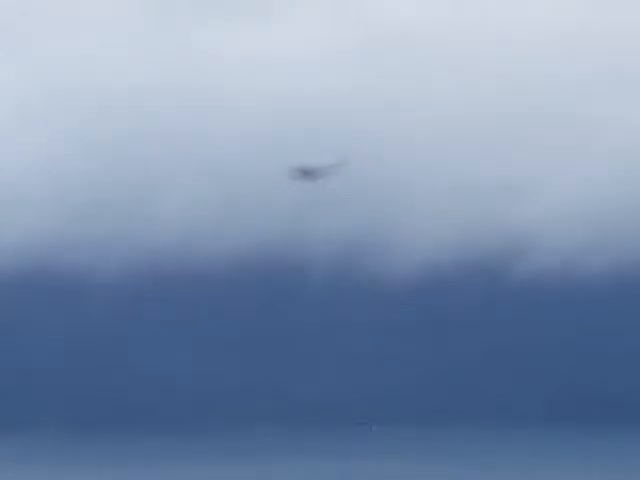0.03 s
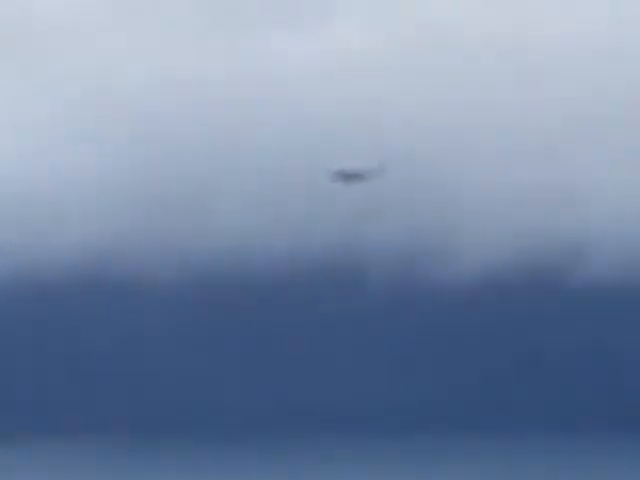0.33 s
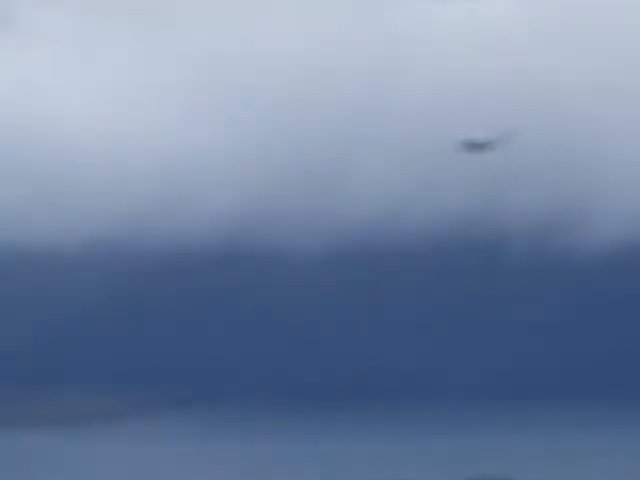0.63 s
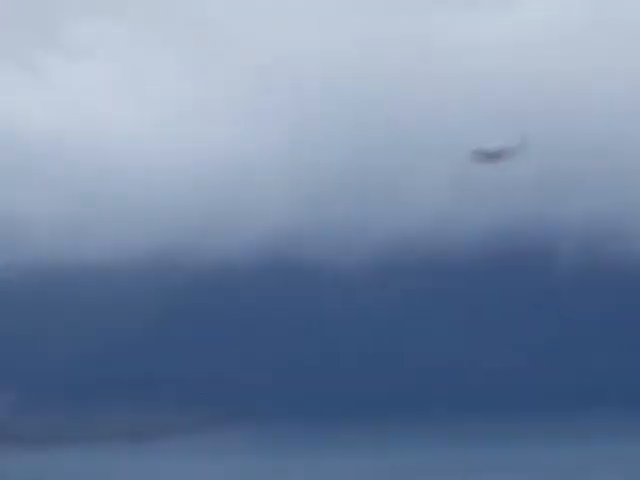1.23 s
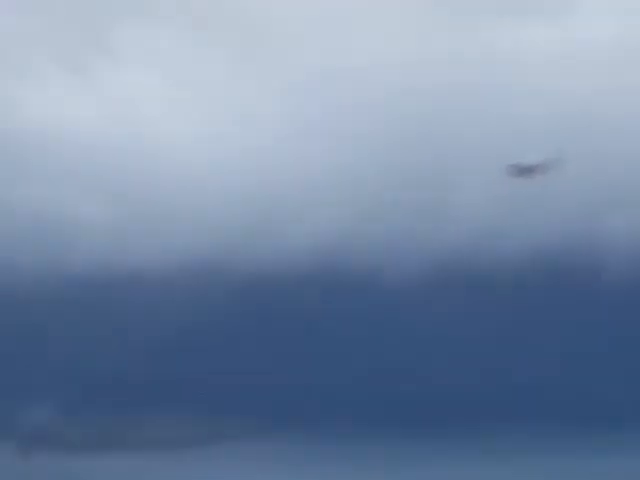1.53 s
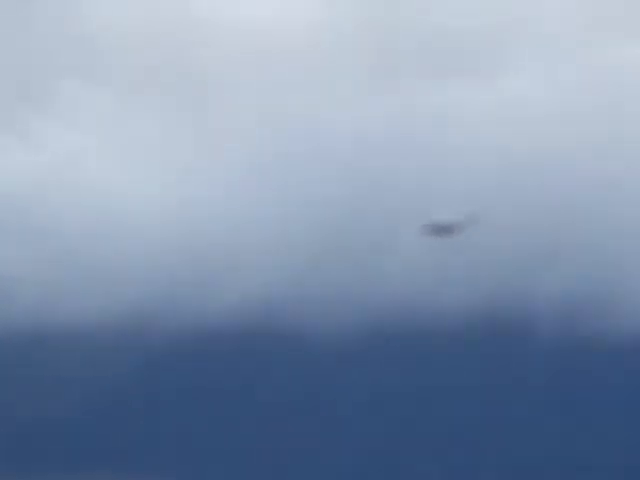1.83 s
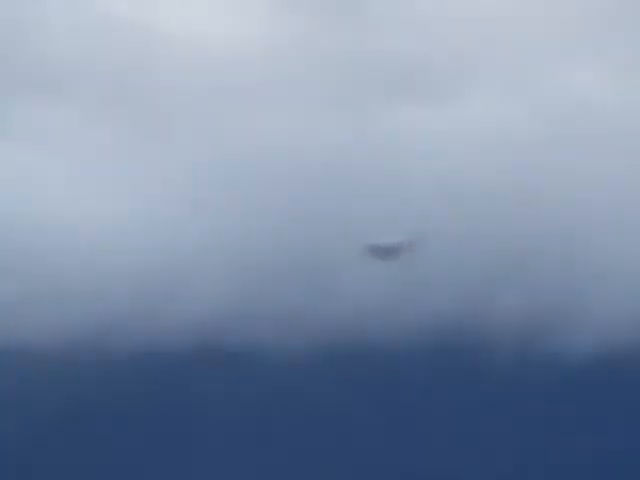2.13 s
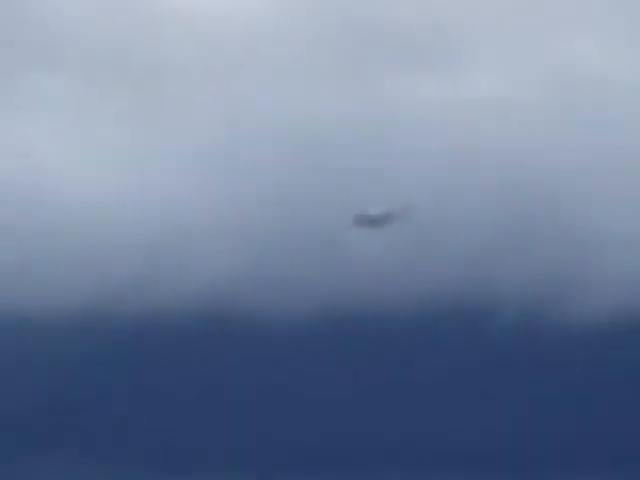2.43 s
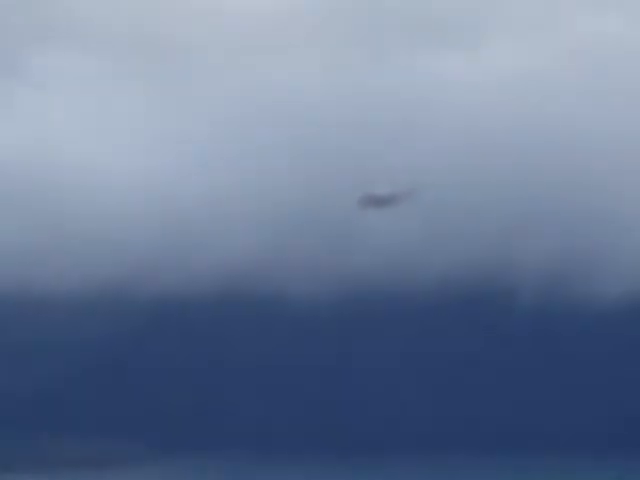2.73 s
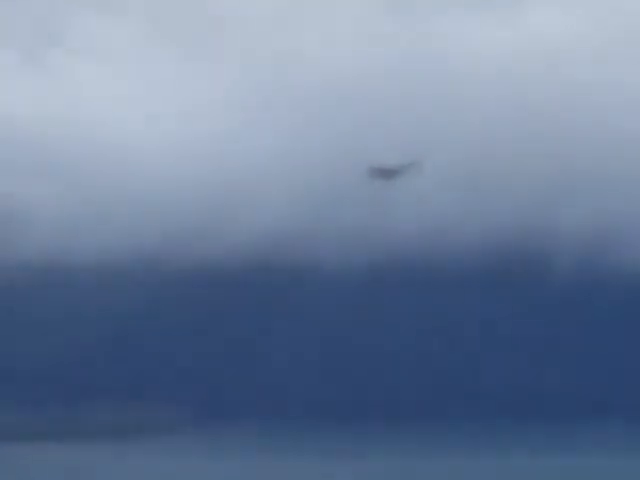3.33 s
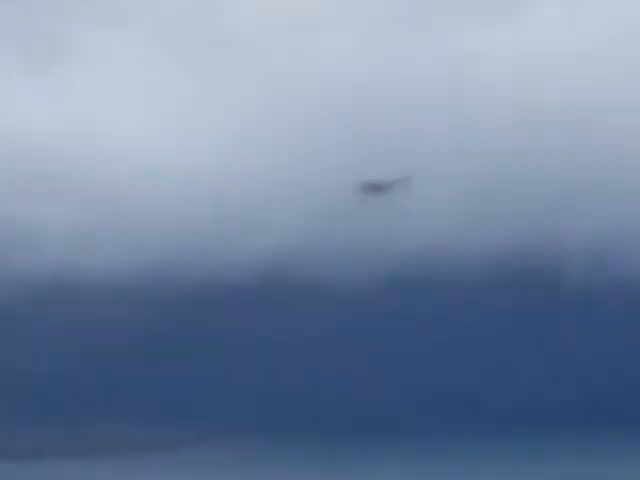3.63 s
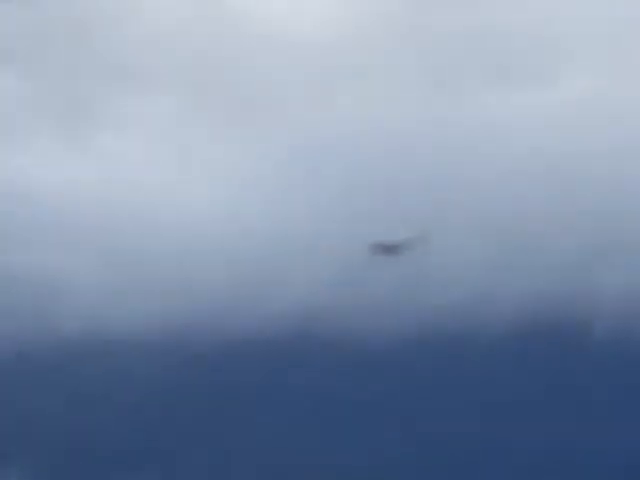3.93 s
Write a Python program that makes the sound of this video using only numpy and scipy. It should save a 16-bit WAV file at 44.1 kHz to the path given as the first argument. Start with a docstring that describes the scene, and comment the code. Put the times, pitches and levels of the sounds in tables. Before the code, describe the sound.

A helicopter cruises steadily for all four seconds, heard from inside the cabin. A strong low blade drone blends with gear whine and a thin turbine whistle, while air rumbles over the cabin and hisses lightly on the right. Around 0.7 seconds a slight rasp swells on the right and fades. Five faint handling ticks follow between 1.3 and 1.9 seconds, and the drone carries on.

```python
"""Inside a small aircraft, probably a helicopter, in steady cruise.
From the start, a strong blade drone, gear tones and a thin turbine whistle ride one shaft speed,
while air rumbles over the cabin and hisses past a seal on the right. Around 0.7 s a narrow rasp
swells on the right. Five faint handling ticks follow between 1.3 and 1.9 s; the cruise carries on."""
import sys
import numpy as np
from scipy import signal
from scipy.fft import rfft, irfft
from scipy.io import wavfile
from scipy.ndimage import uniform_filter1d, minimum_filter1d

SR = 44100
rng = np.random.default_rng(int(sys.argv[2]) if len(sys.argv) > 2 else 0)


def master_out(mix):
    """Clip the mix to full scale and print it as 16-bit PCM to the path in sys.argv[1]."""
    frames = np.transpose(np.atleast_2d(mix))
    ceiling = np.clip(frames, -1, 1)
    pcm = np.round(ceiling * 32767).astype(np.int16)
    wavfile.write(sys.argv[1], SR, pcm)


N = 176400
TIME = np.arange(N) / SR

# shaft speed, heard as the pitch of the main gear whine (time [s], pitch [Hz])
SHAFT_SPEED = [(0, 2652), (.5, 2649.8), (1.4, 2646.5), (1.85, 2652), (2.4, 2650.7), (3.1, 2652.8),
               (4, 2652.7)]
# fader ride on the blade drone's fundamental (time [s], relative level [dB])
DRONE_RIDE = [(0, -13), (.35, -10), (.55, -12), (.7, -9), (.9, -9.5), (1.05, -14), (1.25, -11.5),
              (1.5, -10.5), (1.8, -11.5), (2.3, -10.5), (2.7, -9), (3.25, -10.5), (3.6, -10), (4, -11.5)]
# overtones of the drone (multiple of the blade rate, left level [dB], right level [dB])
DRONE_OVERTONES = [(2, -26, -30), (3, -29.5, -30), (4, -28.5, -35.5), (5, -43, -35), (6, -35.5, -44)]
# gearbox and accessory tones at cruise (pitch [Hz], left level [dB], right level [dB])
GEAR_TONES = [(195, -31, -34), (498, -36, -41), (593.5, -48, -35), (669.4, -29.2, -33.2), (780.6, -45, -44),
              (1106, -56, -48), (1426.3, -58, -52), (1746.5, -56, -46.5), (2006, -60, -53)]
# main whine and sidebands a blade rate away (pitch [Hz], left base level [dB], right base level [dB])
WHINE_TONES = [(2548, -48.7, -53), (2650, -48, -51.3), (2752, -59.5, -66)]
# ride on the whine and its sidebands (time [s], gain [dB])
WHINE_RIDE = [(.2, -0.5), (.7, -0.5), (.9, 2.5), (1.43, -2), (2.1, .8), (2.65, 2), (3.2, -2), (3.9, 2.5)]
# turbine whistles at cruise (pitch [Hz], width [Hz], relative level [dB])
WHISTLES = [(11375, 18, -68.5), (11480, 24, -69.8), (14058, 38, -56.3), (14065, 220, -62.5)]
# ride on the whistles (time [s], lower pair gain [dB], upper pair gain [dB])
WHISTLE_RIDE = [(0, 2, -1.5), (.65, -1, -1), (.88, 10, -1), (1.35, -4, 0.5), (1.68, 5, 2.5), (1.9, 1, 0),
                (2.2, -8, .5), (2.55, 3, 2.5), (3.1, 3, 1.5), (3.5, 4, 3), (4, 0, 2)]
# tone colour of the air over the cabin (frequency [Hz], relative density [dB])
RUSH_SPECTRUM = [(20, -29), (32, -25), (45, -17.5), (56, -10), (70, -12.5), (100, 0.5), (150, 1.5),
                 (200, -3), (224, -6.5), (245, 0), (275, -9.5), (350, -5.5), (455, -12.5), (510, -9),
                 (560, -15), (660, -15), (850, -18), (970, -22), (1170, -21), (1480, -26), (1680, -26),
                 (1900, -28.5), (2120, -28), (2400, -34), (2700, -36), (3200, -39.5), (3900, -41),
                 (5000, -51), (9000, -64), (15000, -73.5)]
# pan of the rush (frequency [Hz], left minus right [dB])
RUSH_PAN = [(150, 1), (260, -0.1), (420, 0), (600, -2.5), (1150, -0.5), (1600, -5), (2100, -4), (2500, 0),
            (3400, 3), (4200, -1.5)]
# how alike the two sides of the rush are (frequency [Hz], coherence [0..1])
RUSH_COHERENCE = [(20, .985), (90, .995), (150, .98), (260, .88), (350, .93), (500, .72), (700, .45),
                  (950, .28), (1250, .38), (2000, .2), (4000, .05)]
# phase between the sides of the rush (frequency [Hz], left lead [rad])
RUSH_PHASE = [(40, 0.33), (200, 0.03), (440, 0), (680, 1), (950, 3), (1700, 3), (2300, 5.5)]
# ride on the deep buffeting (time [s], gain [dB])
BUFFET_RIDE = [(0, 8), (.3, -3.5), (.72, 6), (1.2, -2.5), (2.3, -2), (3.1, -1), (4, 0.3)]
# ride on the low rumble (time [s], gain [dB])
RUMBLE_RIDE = [(0, -0.8), (1.2, 0.3), (1.6, -1.8), (2.05, -0.5), (2.75, 1.6), (3.5, -1), (3.85, 2)]
# ride on the mids of the rush (time [s], gain [dB])
MID_RIDE = [(0, 4), (.4, 3.5), (.75, 5.5), (1.2, 1), (1.8, 1), (2.2, 1.5), (2.65, 3), (3.2, -0.5), (3.6, 2),
            (4, 1)]
# ride on its upper mids (time [s], gain [dB])
UPPER_MID_RIDE = [(.8, 1.1), (2.2, -1), (3.3, 0), (4, -0.5)]
# ride on a high shelf shared by rush and hiss (time [s], gain [dB])
TREBLE_RIDE = [(0, 0.5), (.8, 1), (1.3, 0), (2.2, 0.4), (2.5, 2.5), (3.1, 0.7), (3.6, 1.6), (4, 2)]
# seal and engine hiss (frequency [Hz], left relative density [dB], right relative density [dB])
HISS_SPECTRUM = [(2500, -25.5, -23), (4200, -13.5, -12), (5200, -14.5, -5.5), (6500, -14, -3.5),
                 (7300, -10.5, 2), (8200, -8.5, -12.5), (9600, -28, -24), (10740, -24, -24.5),
                 (11330, -15.5, -13), (13000, -16.5, -14.5), (14400, -12.5, -11.5), (15600, -18, -24.5)]
# handling ticks (time [s], level before envelope [dB], centre [Hz], width [oct], left minus right [dB])
HANDLING_TICKS = [(1.272, -41, 7270, .2, -8), (1.531, -35, 7000, 0.12, -15), (1.553, -41, 7000, .15, -2),
                  (1.909, -42, 12500, .17, -3), (1.911, -44, 6820, .3, -7)]


def amp(db):
    """Decibels to gain."""
    return 10 ** (np.asarray(db) / 20)


def unit(x):
    """Scales to rms 1."""
    return x / np.sqrt(np.mean(abs(x) ** 2) + 1e-30)


def curve(points, t):
    """Reads an automation curve at the given times."""
    return np.interp(t, *np.transpose(points))


def colour(points, hz, column=1):
    """Reads one column of a table over log frequency."""
    table = np.array(points)
    return np.interp(np.log(hz + 1), np.log(table[:, 0] + 1), table[:, column])


def bell(hz, centre_hz, octaves):
    """A smooth band around a centre frequency."""
    return np.exp(-.5 * (np.log2((hz + 1) / centre_hz) / octaves) ** 2)


def pan(db):
    """Left and right gains for a level difference."""
    return amp(np.array([db, -db]) / 2)


def waver(rate_hz, count=4000):
    """Complex random modulation of rms 1, up to about the given rate."""
    noise = rng.standard_normal(count) + 1j * rng.standard_normal(count)
    hz = np.fft.fftfreq(count, N / SR / count)
    slow = np.fft.ifft(noise / (1 + (hz / rate_hz) ** 4))
    return unit(np.interp(TIME, np.linspace(0, N / SR, count), slow))


def shaft_tone(hz, delay_s=0, cruise_hz=2650):
    """A complex tone, its real part of rms 1, whose pitch follows the shaft speed."""
    clock = np.cumsum(curve(SHAFT_SPEED, TIME) / cruise_hz) / SR
    return np.sqrt(2) * np.exp(2j * np.pi * hz * (clock - delay_s))


def blade_drone(blade_hz=101.92, trim_db=-.5, left_lag_s=.00019):
    """The blades fill the cabin with a nearly pure drone; its overtones waver in the turbulence."""
    swell = amp(curve(DRONE_RIDE, TIME) + trim_db) * (1 + .047 * waver(rate_hz=6.7))
    out = np.array([swell * shaft_tone(blade_hz, lag) for lag in (left_lag_s, 0)])
    for multiple, left_db, right_db in DRONE_OVERTONES:
        tone = shaft_tone(multiple * blade_hz, rng.random())
        turbulence = unit(1 + .64 * waver(rate_hz=4.5))
        out += amp([[left_db], [right_db]]) * tone * turbulence
    return out.real


def gearbox(right_lag_s=.00033):
    """Meshing gears sing tones that reach the left side first; the main whine swells and fades."""
    out = np.zeros((2, N))
    for tones, ride_db in (GEAR_TONES, 0), (WHINE_TONES, curve(WHINE_RIDE, TIME)):
        for hz, left_db, right_db in tones:
            left = amp(ride_db) * shaft_tone(hz, rng.random())
            right = left * np.exp(-2j * np.pi * hz * right_lag_s)
            for side, (db, tone) in enumerate([(left_db, left), (right_db, right)]):
                wobble = unit(1 + .055 * waver(rate_hz=5.1))
                out[side] += amp(db) * (tone * wobble).real
    return out


def turbine(trim_db=-.5):
    """A lower and an upper pair of blade whistles, scattered so that each side flutters by itself."""
    times, lower_db, upper_db = np.transpose(WHISTLE_RIDE)
    out = np.zeros((2, N))
    for (hz, width_hz, db), ride_db in zip(WHISTLES, (lower_db, lower_db, upper_db, upper_db)):
        flutter = np.array([waver(width_hz / 2), waver(width_hz / 2)])
        gain = amp(trim_db + db + np.interp(TIME, times, ride_db))
        out += gain * (shaft_tone(hz) * flutter).real
    return out


def air_frames(patch_db, swell_db, size, shelf_hz=1600):
    """Two unrelated short-time noise spectra sharing turbulent patches, swells and the treble ride."""
    hop = size // 4
    t = np.arange(N // hop + 5)[:, None] * hop / SR
    hz = np.fft.rfftfreq(size, 1 / SR)
    draws = np.moveaxis(rng.standard_normal((len(t), len(hz), 5)), -1, 0)
    noise = draws[[0, 2]] + 1j * draws[[1, 3]]
    patches = uniform_filter1d(draws[4], size=8, axis=0)  # smeared over time
    patches = unit(uniform_filter1d(patches, size=12, axis=1))  # and over frequency
    swell = unit(uniform_filter1d(rng.standard_normal(len(t)), size=14))[:, None]
    treble_db = curve(TREBLE_RIDE, t) * hz ** 2 / (hz ** 2 + shelf_hz ** 2)
    return t, hz, noise * amp(patch_db * patches + swell_db * swell + treble_db)


def from_frames(frames):
    """Short-time spectra to stereo sound of rms 1."""
    size = 2 * (frames.shape[-1] - 1)
    _, sound = signal.istft(frames, nperseg=size, noverlap=size * 3 // 4, time_axis=1, freq_axis=2)
    return unit(sound[:, :N])


def air_rush(level_db=-15, buffet_hz=74, rumble_hz=390):
    """Airflow shakes the cabin: nearly mono in the bass, diffuse above."""
    t, hz, (left, diffuse) = air_frames(patch_db=.51, swell_db=.51, size=2048)
    coherence = colour(RUSH_COHERENCE, hz)
    right = coherence * left + np.sqrt(1 - coherence ** 2) * diffuse
    right *= np.exp(-1j * colour(RUSH_PHASE, hz)) * rasp(t, hz)
    buffet = curve(BUFFET_RIDE, t) * np.exp(-(hz / buffet_hz) ** 2)
    rumble = curve(RUMBLE_RIDE, t) * np.exp(-(hz / rumble_hz) ** 2)
    mids = curve(MID_RIDE, t) * bell(hz, centre_hz=623, octaves=.37)
    upper_mids = curve(UPPER_MID_RIDE, t) * bell(hz, centre_hz=1600, octaves=.5)
    eq = amp(colour(RUSH_SPECTRUM, hz) + buffet + rumble + mids + upper_mids)
    balance = pan(colour(RUSH_PAN, hz))[:, None]
    return amp(level_db) * from_frames(np.array([left, right]) * eq * balance)


def seal_hiss(level_db=-44.5):
    """Air leaks past a seal, mostly on the right, over the engine's fizz."""
    _, hz, frames = air_frames(patch_db=.84, swell_db=-.13, size=512)
    eq = amp([colour(HISS_SPECTRUM, hz, column) for column in (1, 2)])
    return amp(level_db) * from_frames(frames * eq[:, None])


def rasp(t, hz, peak_s=.72, spread_s=.35, boost_db=5):
    """Gain of a narrow band that swells once out of the rush, heard as a rasp."""
    swell = np.exp(-((t - peak_s) / spread_s) ** 2)
    return amp(boost_db * swell * bell(hz, centre_hz=1650, octaves=.027))


def handling_ticks(rise_s=.0024, decay_s=.0068):
    """A hand scuffs a surface close by: short, bright bursts of noise, right of centre."""
    out = np.zeros((2, N))
    t = np.arange(SR // 10) / SR
    hz = np.fft.rfftfreq(len(t), 1 / SR)
    envelope = np.minimum(t / rise_s, 1) * np.exp(-t / decay_s)
    for start_s, db, centre_hz, octaves, pan_db in HANDLING_TICKS:
        noise = rng.standard_normal((2, len(t)))
        scuff = unit(irfft(rfft(noise) * bell(hz, centre_hz, octaves)))
        at = round(start_s * SR)
        out[:, at:at + len(t)] += amp(db) * pan(pan_db)[:, None] * scuff * envelope
    return out


def scene():
    """The cabin mix: machinery, air and a few ticks on top."""
    return blade_drone() + gearbox() + turbine() + air_rush() + seal_hiss() + handling_ticks()


def record(dry, ceiling=.96, cutoff_hz=15720):
    """A quick limiter holds down the peaks, then a steep low-pass trims the top."""
    gain = np.minimum(1, ceiling / (abs(dry).max(0) + 1e-9))
    gain = uniform_filter1d(minimum_filter1d(gain, size=441), size=441)  # 10 ms hold and smoothing
    lowpass = signal.firwin(1023, cutoff_hz, window=("kaiser", 9), fs=SR)
    return signal.oaconvolve(dry * gain, lowpass[None], "same")


dry = scene()
out = record(dry)
master_out(out)
```